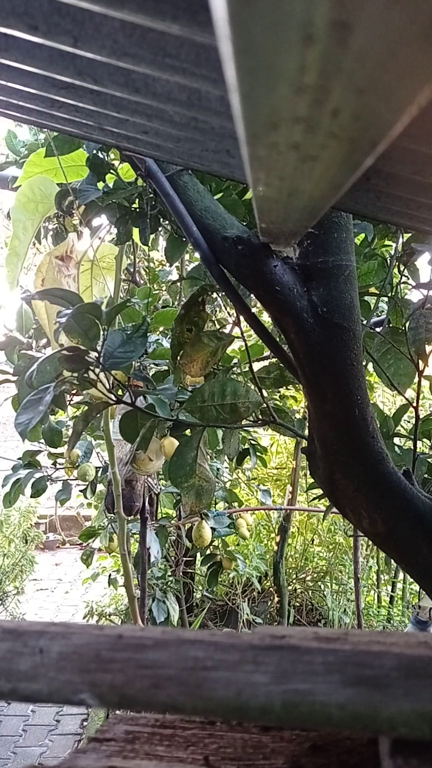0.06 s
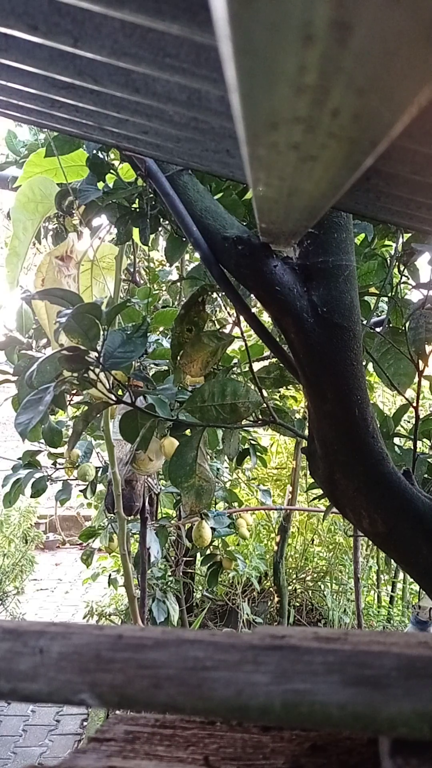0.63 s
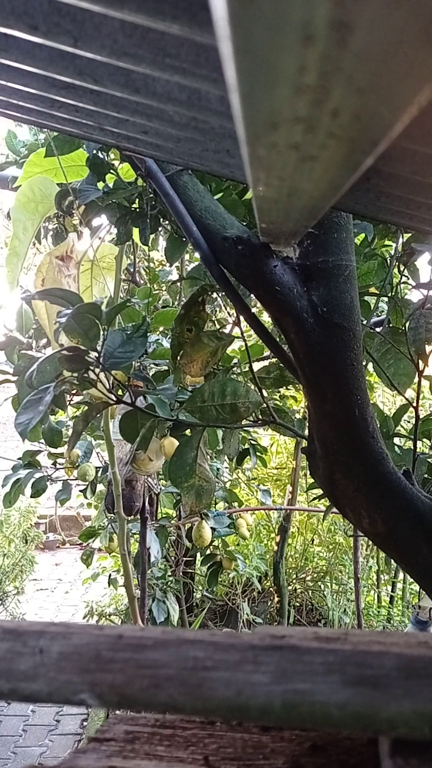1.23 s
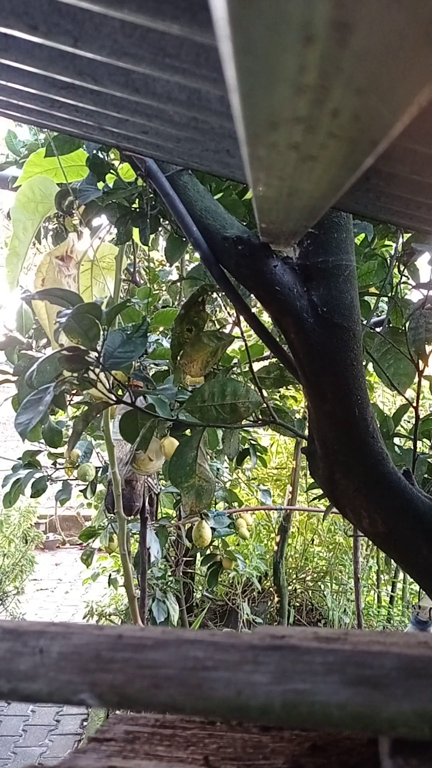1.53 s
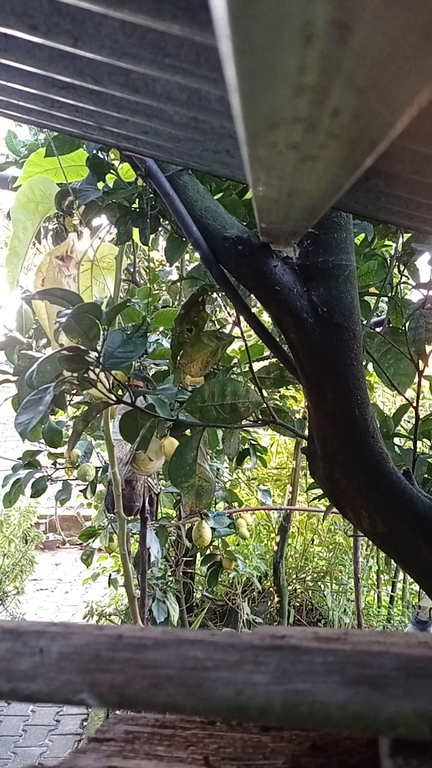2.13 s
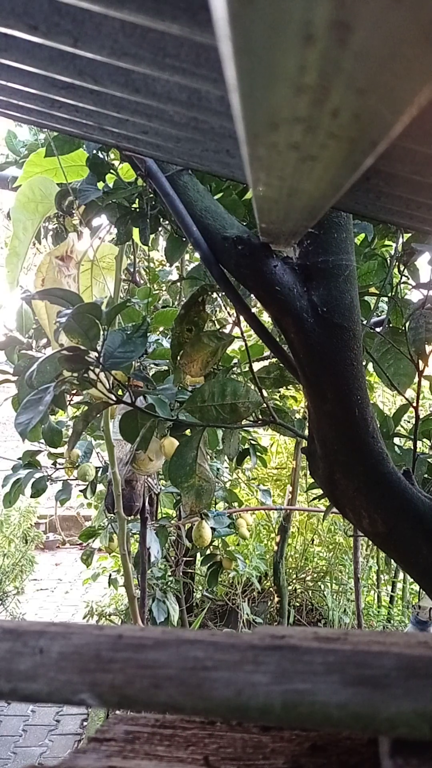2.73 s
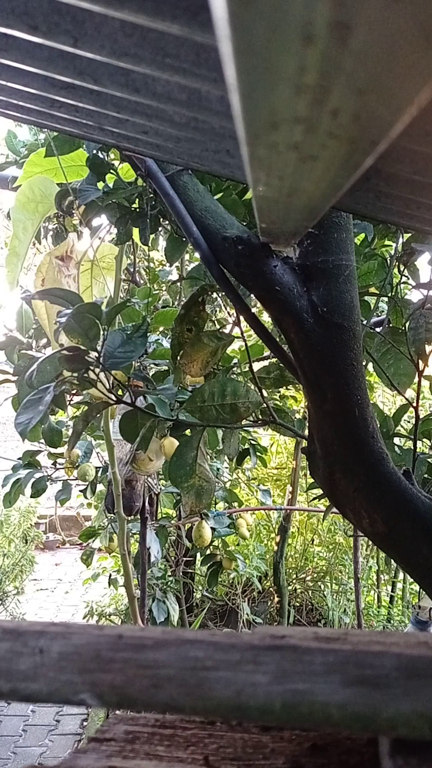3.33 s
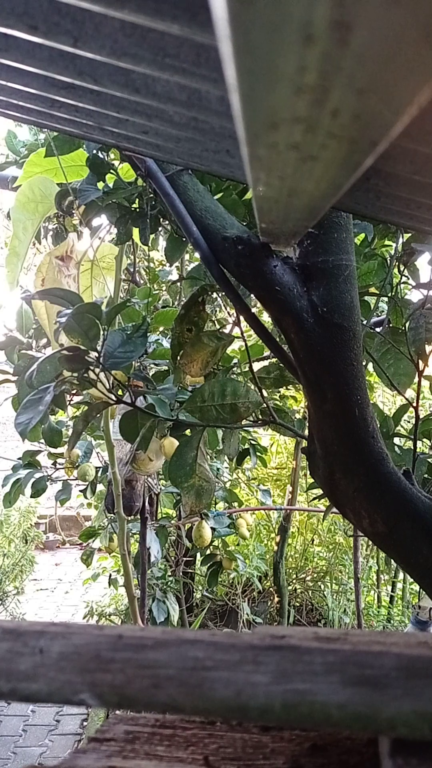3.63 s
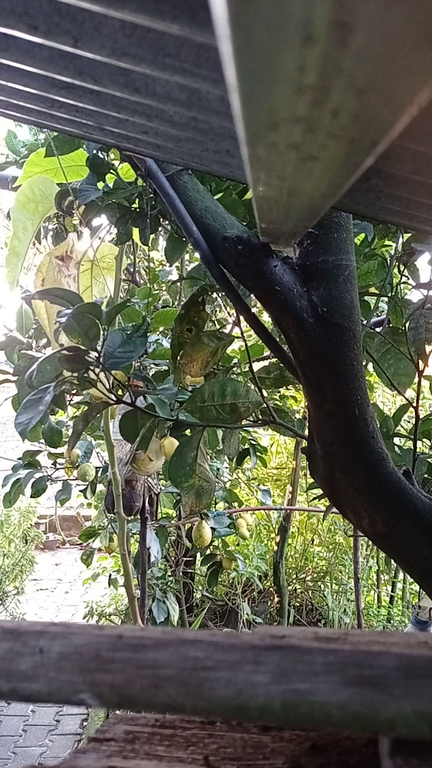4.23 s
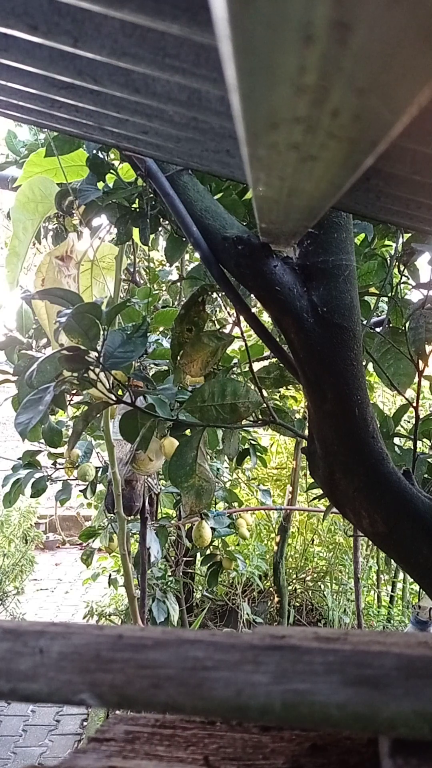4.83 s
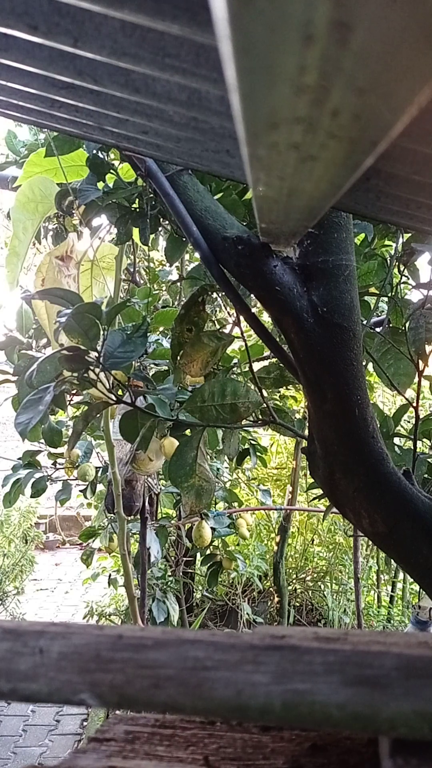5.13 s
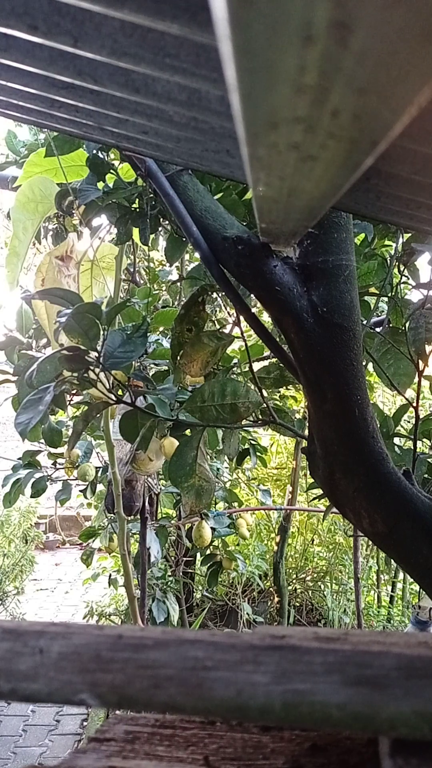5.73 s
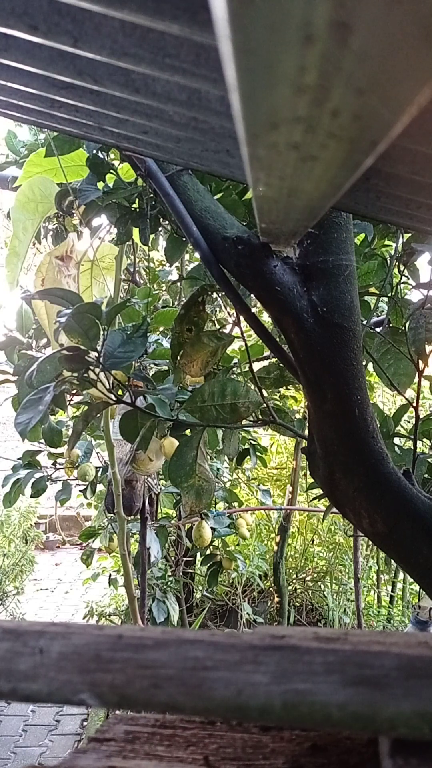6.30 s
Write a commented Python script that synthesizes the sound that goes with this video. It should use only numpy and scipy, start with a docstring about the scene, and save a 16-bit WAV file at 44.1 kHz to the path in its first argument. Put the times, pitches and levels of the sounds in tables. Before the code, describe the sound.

Birds sing in a quiet garden over a faint hiss of air, with a short echo from a metal roof and walls. From the start until about 2.5 seconds, a nearby blackbird flutes a warbled phrase, followed by a thin, very high whistle until 2.9 and a softer nasal twitter until 3.2. Small songbirds give quick rising chirps throughout, with short trills of falling notes near 0.3, 1.8 and 3.2 seconds. Leaves rustle lightly around 1 second and again from 2.6 to 3, where a very soft rumble swells once. The second half is sparser, with faint thin notes and clusters of bright chirps around 4.5 and 6 seconds. Farther off, hens croon and cluck quietly, mostly in the first second and a half, and one gives a longer, soft rising call from 5.9 to the end at about 6.5 seconds.

```python
"""A garden, heard from under a sheet-metal roof. A blackbird flutes a warbled phrase and ends on a thin
whistle and a nasal twitter; small songbirds chirp and trill. Their pure tones come from the syrinx,
where airflow sets membranes vibrating. Farther off, hens croon and cluck: pulsing membranes are the
source and the throat is the filter. Leaves rustle over faint air, the treble flickers, a soft rumble
swells once, and reflections from the roof and walls give the birds a short echo."""
import sys
import numpy as np
from scipy import signal
from scipy.fft import rfft, irfft
from scipy.io import wavfile

SR = 44100
rng = np.random.default_rng(int(sys.argv[2]) if len(sys.argv) > 2 else 0)


def persist_wave(psi):
    """Save psi, clipped to +-1, as 16-bit WAV."""
    counts = np.round(np.clip(psi, -1, 1) * 32767).astype(np.int16)
    wavfile.write(sys.argv[1], SR, np.atleast_2d(counts).T)


N = 289296
TIME = np.arange(N) / SR
BAND_LIMIT_HZ = 16000

# spectrum of still garden air: frequency_hz, gain_db
AIR_SPECTRUM = [(30, -21.5), (150, -14.5), (400, -14.5), (800, -10.5), (1800, -20), (3300, -5),
                (5300, -8.5), (6700, 3.5), (9000, -5.5), (10500, -29), (16000, -24)]
# its slow change of level: time_s, level_db
AIR_LEVEL = [(0, -53.5), (1.1, -59.5), (2.2, -63.5), (4.2, -62.5), (5.7, -57.5), (6.56, -55.5)]
# hens' croons and hums: start_s, length_s, start_hz, end_hz, level_db, overtone_gain_db, jitter_ratio
CROONS = [(0, 0.116, 623.1, 587.9, -52, 5, 0.01487), (.33, 0.3308, 628.8, 591.9, -60, 6, 0.0215),
          (0.676, 0.309, 550, 546.3, -48, -2, 0.0044), (1.08, 0.3026, 557.5, 542.9, -55, -0.5, .04),
          (1.6, 0.2225, 497, 483.7, -71.5, -25.5, 0.0414),
          (2.906, 0.3275, 543.8, 558.9, -61.5, 1.5, 0.0034), (3.936, 0.0536, 521, 504.8, -68.5, -12, 0.052),
          (4.135, 0.2316, 512.3, 547, -68, -26.5, 0.038), (4.601, 0.348, 482.2, 511, -73, -31.5, 0.0331)]
# throat resonances of a croon: frequency_hz, gain_db
CROON_THROAT = [(1100, 1), (1250, 7), (1650, -14.5), (2200, -4), (2800, -18), (4400, -18.5), (5500, -49.5)]
# rising songbird chirps: start_s, length_s, start_hz, end_hz, level_db
CHIRPS = [ (0.048, .047, 3797, 4945, -20.5), (0.154, 0.0412, 3761, 4828, -26.5),
          (1.276, 0.0575, 3781, 4954, -21.5), (1.394, 0.035, 2978, 5092, -27),
          (1.622, 0.0554, 2490, 3681, -28), (2.24, 0.0458, 3041, 4283, -30.5),
          (2.285, 0.04655, 4396, 5360, -22), (2.917, 0.0813, 3857, 4752, -34.5),
          (3.054, 0.101, 4194, 4671, -41.5), (3.461, 0.0287, 4188, 5475, -24.5),
          (3.481, .04, 7406, 7863, -40.5), (4.369, 0.0287, 3150, 4868, -27.5),
          (4.385, 0.01884, 3843, 4848, -18.5), (4.481, 0.03086, 3194, 4804, -25.5),
          (4.556, .05, 2479, 3779, -28), (4.671, .037, 3701, 4848, -22.5), (4.696, 0.0634, 2326, 3706, -32),
          (5.746, 0.0229, 2312, 3418, -32.5), (5.894, 0.0301, 4154, 4870, -17.5),
          (5.9, 0.0476, 2694, 3478, -36.5), (6.05, 0.0336, 3158, 4875, -25.5),
          (6.065, 0.024, 2624, 3542, -30)]
# blackbird syllables: start_s, length_s, start_hz, end_hz, level_db, crescendo_db, warble_depth_ratio
BLACKBIRD_SYLLABLES = [ (0.115, 0.075, 3455, 2705, -32, 4.5, 0.091),
                       (0.137, 0.1304, 2689, 2263, -24, 2.5, 0.0863),
                       (.30, 0.1047, 3550, 2522, -21, 14, 0.0195),
                       (.415, 0.1789, 2500, 2490, -19, -3, 0.01),
                       (.697, 0.129, 2657, 2931, -26, 0.5, 0.0646),
                       (0.821, 0.0562, 3046, 2657, -18.5, 2, 0.0086),
                       (0.952, 0.1463, 2342, 2134, -24, -8, 0.0484),
                       (1.375, 0.051, 1983, 2400, -29.5, 11, 0.0317),
                       (1.41, 0.0828, 2471, 2514, -20.5, -12, 0.0098),
                       (1.479, .13, 2480, 2336, -28.5, -6, .055),
                       (1.603, 0.1198, 2346, 2245, -22, 8.5, 0.0245),
                       (1.746, 0.0829, 1990, 2414, -21.5, 14, 0.0306),
                       (1.822, 0.0361, 2743, 2764, -15, 4, 0.014),
                       (1.875, 0.0726, 2584, 2526, -31.5, 3.5, 0.0404),
                       (1.966, 0.11, 2474, 2313, -20, 5.5, 0.0033),
                       (2.092, 0.1786, 2323, 2321, -19, -10, 0.00287),
                       (2.333, 0.0468, 2096, 1997, -30.5, 0, 0.0114),
                       (2.393, 0.1198, 1916, 1894, -34.5, -7, .005)]
# hiss in the blackbird's tone: frequency_hz, gain_db
HOARSE_SPECTRUM = [(2500, -35), (3500, 4), (5200, -6.5), (6700, 3.5), (8000, -8), (11000, -22.5)]
# runs of falling notes: start_s, note_count, gap_s, level_db
TRILLS = [(.26, 4, 0.09395, -24), (1.491, 1, .08, -25.5), (1.764, 6, .08, -23), (3.186, 7, .0785, -27.5)]
# hens' hoarse clucks: start_s, length_s, level_db
CLUCKS = [(0.571, 0.081, -47.5), (0.988, 0.0586, -45.5), (1.162, 0.0359, -44.5), (1.29, 0.0753, -53.5),
          (1.369, 0.0474, -43), (3.245, 0.0422, -53), (3.411, 0.0457, -58.5), (3.639, 0.0247, -59)]
# throat resonances of a cluck: frequency_hz, gain_db
CLUCK_THROAT = [(350, -38), (520, -8.5), (700, -22), (950, 1), (1200, -2.5), (1500, -9.5), (2500, -37.5)]
# stirrings among the leaves: start_s, length_s, level_db
RUSTLES = [(0.888, 0.0947, -41.5), (1.115, 0.091, -40.5), (2.568, 0.042, -36), (2.602, 0.125, -43.5),
           (2.709, 0.321, -42.5)]
# spectrum of the leaves: frequency_hz, gain_db
RUSTLE_SPECTRUM = [(200, -23.5), (1200, -17.5), (2500, -7.5), (7000, -2.5), (9000, -5.5), (16000, -33)]
# faint, thin, nearly level bird notes: start_s, length_s, pitch_hz, level_db, rasp_ratio
THIN_NOTES = [(1.631, .077, 1486, -40.5, 0.012), (2.765, 0.1955, 3539, -44, 0.066),
              (3.401, 0.0555, 4659, -43.5, 0.011), (3.851, 0.0772, 3748, -46, 0.031),
              (3.864, 0.101, 6116, -55, .015), (3.99, 0.0993, 6635, -44, 0.0044),
              (4.049, 0.026, 5493, -44.5, 0.0063), (4.979, .26, 6678, -60, 0.0075),
              (5.264, 0.188, 5000, -55.5, .05)]
# contour of the blackbird's closing whistle: time_s, pitch_hz, level_db
WHISTLE_CONTOUR = [(2.465, 7476, -41.5), (2.489, 7371, -20), (2.511, 7439, -22), (2.523, 7434, -16.5),
                   (2.667, 7685, -21), (2.819, 7793, -24), (2.865, 7731, -23), (2.92, 7744, -48.5)]
# the blackbird's nasal twitter: start_s, length_s, start_hz, end_hz, level_db
TWITTER_SYLLABLES = [(2.552, 0.00626, 1065, 1122, -38.5), (2.671, 0.15, 723.7, 895.7, -42),
                     (2.772, 0.243, 1633, 1492, -50.5), (2.912, 0.11, 685, 821.3, -37),
                     (3.037, 0.1313, 664.2, 769, -35.5)]
# throat resonances of the twitter: frequency_hz, gain_db
TWITTER_THROAT = [(700, -64), (1600, -34.5), (2350, 0.5), (3100, -10.5), (4400, 5.5), (5700, -21),
                  (7000, 8.5), (9000, -10), (11000, -25)]
# high two-voiced chips: start_s, level_db
CHIPS = [(3.339, -35.5), (3.606, -30), (5.221, -33), (5.923, -36), (6.07, -39.5)]
# the two sides of the syrinx in a chip: start_hz, end_hz, gain_db
CHIP_VOICES = [(6242, 7300, 2.5), (5763, 6150, -4)]
# throat resonances of a hen's long call: frequency_hz, gain_db
LONG_CALL_THROAT = [(1000, 4), (1500, 4), (2000, -5), (2500, -14.5), (3000, -10.5), (3500, -2), (4000, 1.5),
                    (4500, -9.5), (5000, -8), (5600, -27), (6500, -12.5), (8000, -18), (9500, -34.5)]
# time the echo takes to fall by 60 dB: frequency_hz, decay_s
GARDEN_T60 = [(500, 0.18), (2500, 0.2634), (4500, 0.2081), (8000, 0.2058), (15000, 0.017)]
# treble response of the microphone: frequency_hz, gain_db
MICROPHONE_RESPONSE = [(9200, 0.5), (11000, -12.5), (16000, -20)]


def amp(db):
    """Amplitude grows tenfold for every 20 dB."""
    return 10 ** (np.asarray(db) / 20)


def unit(x):
    """Normalisation to an rms of 1."""
    return x / np.sqrt(np.mean(x ** 2) + 1e-20)


def value_at(points, hz):
    """Interpolation on a logarithmic frequency axis."""
    frequencies, values = np.transpose(points)
    return np.interp(np.log(hz + 1), np.log(frequencies), values)


def add(mix, start_s, sound):
    """Superposition: a sound adds to the mix from start_s on."""
    part = mix[max(round(start_s * SR), 0):][:len(sound)]
    part += sound[:len(part)]


def filtered(x, response):
    """Linear filtering: the spectrum is multiplied by a frequency response."""
    return irfft(rfft(x) * amp(value_at(response, np.fft.rfftfreq(N, 1 / SR))), N)


def noise(spectrum):
    """Filtering colours white noise; the result has an rms of 1."""
    return unit(filtered(rng.standard_normal(N), spectrum))


def waver(size, rate_hz):
    """Random modulation: straight lines join rate_hz random values a second."""
    knots = rng.standard_normal(size // 8 + 2)
    return np.interp(np.arange(size) * rate_hz / SR, np.arange(len(knots)), knots)


def faded(x, edge_s=0.0065):
    """A cosine taper softens onset and release."""
    return x * signal.windows.tukey(len(x), min(1, 2 * edge_s * SR / len(x)))


def easing(length_s, bend):
    """A power law falls from 1 to 0; with bend above 1 it starts fast and levels off."""
    return np.linspace(1, 0, round(length_s * SR)) ** bend


def glide(length_s, start_hz, end_hz, bend):
    """A frequency sweep along a power law."""
    return end_hz + (start_hz - end_hz) * easing(length_s, bend)


def arch(length_s, sag_db, rise_db):
    """A parabolic envelope in dB: softer at both ends, and tilted by rise_db."""
    position = np.linspace(-.5, .5, round(length_s * SR))
    return rise_db * position - sag_db * (2 * position) ** 2


def syrinx(hz, second_db, third_db):
    """Nearly sinusoidal vibration: a fundamental with weak second and third harmonics."""
    phase = 2 * np.pi * np.cumsum(hz) / SR
    second = amp(second_db) * np.sin(2 * phase)
    third = amp(third_db) * np.sin(3 * phase) * (3 * hz < BAND_LIMIT_HZ)
    return np.sqrt(2) * (np.sin(phase) + second + third)


def reedy(hz, throat, first=1):
    """Source and filter: throat resonances weight the harmonics of a pulsing membrane."""
    phase = 2 * np.pi * np.cumsum(hz) / SR
    return np.sqrt(2) * sum(amp(value_at(throat, k * hz)) * (k * hz < 11500) * np.cos(k * phase)
                            for k in range(first, 18))


def air(flutter_db=0.63):
    """Ambient noise: a faint broadband hiss whose level drifts."""
    level_db = np.interp(TIME, *np.transpose(AIR_LEVEL)) + flutter_db * waver(N, 66)
    return amp(level_db) * noise(AIR_SPECTRUM)


def hen_voice(hz, level_db, overtone_db, throat, jitter):
    """Jitter and shimmer: uneven pulses roughen the pitch and the overtones of a held note."""
    hz = hz * (1 + jitter * (waver(len(hz), 500) + .5 * waver(len(hz), 34.678)))
    shimmer = 1 + 14 * jitter * waver(len(hz), 600)
    tone = syrinx(hz, second_db=-41.5, third_db=-41)
    overtones = amp(overtone_db) * shimmer * reedy(hz, throat, first=2)
    return faded(amp(level_db) * (tone + overtones), edge_s=0.0093)


def croons(beak_opening_db=12.5):
    """Radiation from the beak: a hen's overtones grow as it opens."""
    out = np.zeros(N)
    for start_s, length_s, start_hz, end_hz, db, overtone_db, jitter in CROONS:
        hz = glide(length_s, start_hz, end_hz, bend=1.3)
        level_db = db + arch(length_s, sag_db=1, rise_db=2)
        beak_db = overtone_db + arch(length_s, sag_db=0, rise_db=beak_opening_db)
        add(out, start_s, hen_voice(hz, level_db, beak_db, CROON_THROAT, jitter))
    return out


def slide(length_s, start_hz, end_hz, rasp):
    """Random frequency modulation adds rasp to a gliding tone, which swells in the middle."""
    hz = glide(length_s, start_hz, end_hz, bend=1.25)
    tone = syrinx(hz * (1 + rasp * waver(len(hz), 900)), second_db=-34, third_db=-45.5)
    return tone * signal.windows.tukey(len(hz), .9)


def treble_flicker(count=60, until_s=3.75, low_hz=3084, high_hz=7545, loudest_db=-49.5, spread_db=6):
    """Frequency sweeps: faint, short, high tones glide up or down at random times and pitches."""
    out = np.zeros(N)
    for k, (when, pitch, slope, softness) in enumerate(rng.random((count, 4))):
        start_hz = low_hz + pitch * (high_hz - low_hz)
        end_hz = start_hz * (1 + 0.15 * (2 * slope - 1))
        note = slide(0.089, start_hz, end_hz, rasp=.035)
        add(out, (k + when) / count * until_s, amp(loudest_db - spread_db * softness) * note)
    return out


def chirp(length_s, start_hz, end_hz):
    """A quick sweep whose rasp is proportional to its sweep rate."""
    octaves_per_s = abs(np.log2(end_hz / start_hz)) / length_s
    return slide(length_s, start_hz, end_hz, rasp=0.003255 * octaves_per_s)


def rising_chirps():
    """Brief upward frequency sweeps of the syrinx are heard as chirps."""
    out = np.zeros(N)
    for start_s, length_s, start_hz, end_hz, db in CHIRPS:
        add(out, start_s, amp(db) * chirp(length_s, start_hz, end_hz))
    return out


def blackbird(warble_hz=135, jitter=0.0045, flutter_db=1.2, hoarse_db=-29, patchy_db=4):
    """Fast frequency modulation makes some fluted notes burry; a hoarse hiss follows their level."""
    tones, envelope = np.zeros(N), np.zeros(N)
    for start_s, length_s, start_hz, end_hz, db, rise_db, depth in BLACKBIRD_SYLLABLES:
        hz = glide(length_s, start_hz, end_hz, bend=1.4)
        level_db = db + arch(length_s, sag_db=3.5, rise_db=rise_db) + flutter_db * waver(len(hz), 90)
        rate_hz = warble_hz * (1 + 0.22 * waver(len(hz), 90))
        warble = np.sin(2 * np.pi * np.cumsum(rate_hz) / SR) * (1 + 0.34 * waver(len(hz), 120))
        hz = hz * (1 + depth * warble + jitter * waver(len(hz), 200))
        add(tones, start_s, faded(amp(level_db) * syrinx(hz, second_db=-38.5, third_db=-33)))
        add(envelope, start_s, faded(amp(level_db)))
    hiss = amp(hoarse_db + patchy_db * waver(N, 40)) * noise(HOARSE_SPECTRUM)
    return tones + envelope * hiss


def trills(rasp=0.038, slowing_s=.003, soft_start_db=5, warmup_notes=1.241):
    """Nearly periodic repetition of one falling note; each run gains force and slows a little."""
    out = np.zeros(N)
    for start_s, note_count, gap_s, db in TRILLS:
        for k in range(round(note_count)):
            hz = glide(.04, start_hz=4084, end_hz=2976.4, bend=1.8) * (1 + 0.013 * rng.standard_normal())
            tone = syrinx(hz * (1 + rasp * waver(len(hz), 1000)), second_db=-41, third_db=-35.5)
            force = amp(db - soft_start_db * np.exp(-k / warmup_notes))
            onset_s = start_s + k * gap_s + slowing_s * k ** 2 / 2
            add(out, onset_s, force * faded(tone, edge_s=0.01792))
    return out


def clucks(jitter=0.15):
    """Aperiodic vibration: strong jitter makes a hen's low, falling pulses hoarse."""
    out = np.zeros(N)
    for start_s, length_s, db in CLUCKS:
        hz = glide(length_s, start_hz=325, end_hz=259.1, bend=0.77)
        voice = reedy(hz * (1 + jitter * waver(len(hz), 500)), CLUCK_THROAT)
        add(out, start_s, amp(db) * faded(unit(voice), edge_s=0.031))
    return out


def leaves(crackle_db=3.4):
    """Random amplitude modulation makes each dying rustle of noise crackle."""
    envelope = np.zeros(N)
    for start_s, length_s, db in RUSTLES:
        add(envelope, start_s, amp(db) * faded(easing(length_s, bend=2), edge_s=0.00327))
    return envelope * amp(crackle_db * waver(N, 350)) * noise(RUSTLE_SPECTRUM)


def thin_notes(fall=.012):
    """Almost sinusoidal vibration gives faint, thin, nearly level bird notes."""
    out = np.zeros(N)
    for start_s, length_s, hz, db, rasp in THIN_NOTES:
        add(out, start_s, amp(db) * slide(length_s, hz * (1 + fall), hz * (1 - fall), rasp))
    return out


def rumble(peak_s=2.581, peak_db=-60, rise_db_per_s=326, fall_db_per_s=57.5, lumpy_db=5):
    """Exponential growth and decay: soft, lumpy low noise swells quickly and dies away."""
    since_s = TIME - peak_s
    swell_db = np.minimum(rise_db_per_s * since_s, -fall_db_per_s * since_s)
    envelope = amp(peak_db + swell_db + lumpy_db * waver(N, 60))
    return envelope * noise([(30, -5), (150, -3), (400, -16), (1200, -19.5), (4000, -62.5)])


def whistle(jitter=0.0018, flutter_db=0.5, overtone_db=-10, pure_start_db=35, growth_s=.04):
    """Harmonic growth: the blackbird's high, slightly rising note starts pure and gains its octave."""
    out = np.zeros(N)
    times_s, pitches_hz, levels_db = np.transpose(WHISTLE_CONTOUR)
    t = np.arange(times_s[0], times_s[-1], 1 / SR)
    hz = np.interp(t, times_s, pitches_hz) * (1 + jitter * waver(len(t), 264.4))
    level_db = np.interp(t, times_s, levels_db) - flutter_db * waver(len(t), 72.4)
    second_db = overtone_db - pure_start_db * np.exp(-(t - t[0]) / growth_s)
    add(out, t[0], faded(amp(level_db) * syrinx(hz, second_db, third_db=-60), edge_s=0.013))
    return out


def twitter(jitter=.016, shimmer_db=4.08):
    """Formants: sharp throat resonances make the blackbird's squeezed, hoarse syllables nasal."""
    out = np.zeros(N)
    for start_s, length_s, start_hz, end_hz, db in TWITTER_SYLLABLES:
        hz = glide(length_s, start_hz, end_hz, bend=2.1)
        hz = hz * (1 + jitter * waver(len(hz), 700))
        voice = reedy(hz, TWITTER_THROAT) * amp(shimmer_db * waver(len(hz), 500))
        add(out, start_s, amp(db) * faded(unit(voice), edge_s=0.0354))
    return out


def chips(length_s=0.033):
    """Biphonation: the two sides of the syrinx sweep through different pitches at once."""
    out = np.zeros(N)
    for start_s, db in CHIPS:
        for start_hz, end_hz, side_db in CHIP_VOICES:
            add(out, start_s, amp(db + side_db) * chirp(length_s, start_hz, end_hz))
    return out


def long_call(start_s=5.93, length_s=.64, final_db=-47.5, swell_db=19, overtone_db=8, opening_db=22):
    """Radiation from an opening beak brightens a nearer hen's call as it rises, swells and levels off."""
    out = np.zeros(N)
    hz = glide(length_s, start_hz=422, end_hz=504.3, bend=3.3)
    level_db = final_db - swell_db * easing(length_s, bend=2.35)
    beak_db = overtone_db - opening_db * easing(length_s, bend=0.607)
    add(out, start_s, hen_voice(hz, level_db, beak_db, LONG_CALL_THROAT, jitter=.019))
    return out


def garden(x, scatter_db, tail_db, echoes_per_s=3000, scatter_t60_s=0.1156):
    """Multipath reflection: roof and leaves smear each note, and the walls beyond add a decaying tail."""
    t = np.arange(SR // 2) / SR
    taps = rng.standard_normal((2, len(t))) * (rng.random((2, len(t))) < echoes_per_s / SR)
    early = taps[0] * (t > .002) * amp(-60 * t / scatter_t60_s)
    paths = np.fft.fft((t == 0) + amp(scatter_db) * early / np.linalg.norm(early))
    # nearly all-pass: the scatter delays each pitch differently but hardly changes its loudness
    minimum_phase = np.exp(signal.hilbert(np.log(abs(paths) + 0.074)).conj())
    scatter = np.fft.ifft(paths / minimum_phase).real * np.exp(-(t / .04) ** 2)
    hz, frame_s, late = signal.stft(taps[1] * (t > .01), SR, nperseg=256)
    decay = amp(-60 * frame_s / value_at(GARDEN_T60, hz)[:, None])
    tail = signal.istft(late * decay, SR, nperseg=256)[1][:len(t)]
    response = scatter / np.linalg.norm(scatter) + amp(tail_db) * tail / np.linalg.norm(tail)
    return signal.fftconvolve(x, response)[:N]


def scene():
    """Superposition: each group of sounds joins the mix with its own ratio of direct sound to echo."""
    near = garden(amp(-0.1148) * blackbird() + whistle(), scatter_db=-3, tail_db=-12)
    small_calls = rising_chirps() + chips() + thin_notes() + twitter()
    bushes = amp(0.6849) * garden(small_calls, scatter_db=6, tail_db=-8.5)
    hedge = amp(-2.5) * garden(trills(), scatter_db=2.5, tail_db=-5.8)
    flicker = garden(treble_flicker(), scatter_db=6, tail_db=-3)
    yard = garden(croons() + long_call() + clucks(), scatter_db=4, tail_db=-5)
    return (near + bushes + hedge + flicker + yard + leaves() + rumble() + air())[None]


def record(dry):
    """Low-pass filtering: the microphone dulls the top treble, and a steep filter limits the band."""
    lowpass = signal.firwin(511, BAND_LIMIT_HZ, window=("kaiser", 9), fs=SR)
    return signal.oaconvolve(filtered(dry, MICROPHONE_RESPONSE), lowpass[None], "same")


dry = scene()
out = record(dry)
persist_wave(out)
```